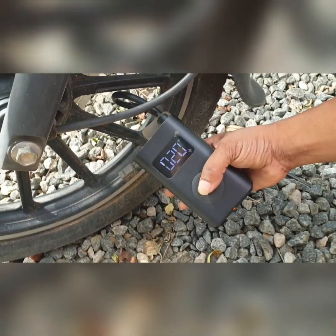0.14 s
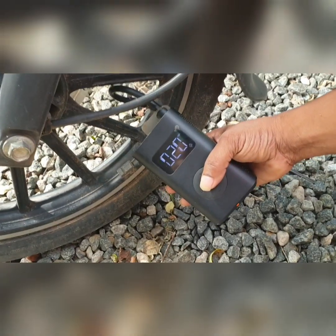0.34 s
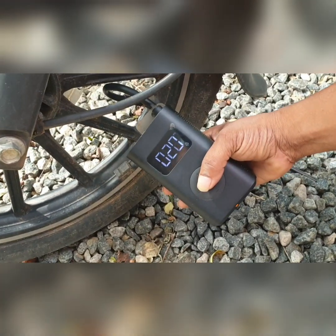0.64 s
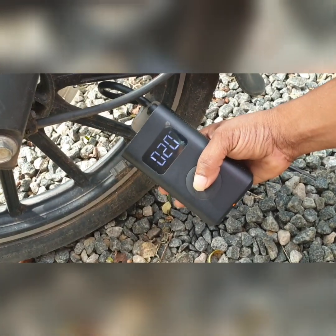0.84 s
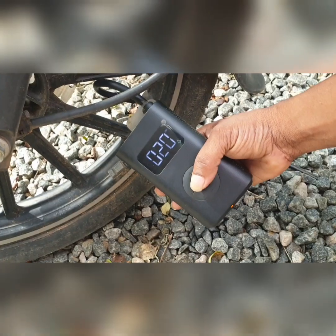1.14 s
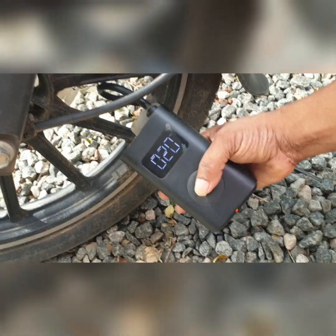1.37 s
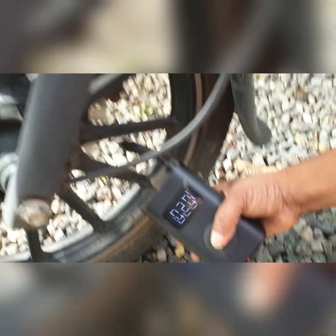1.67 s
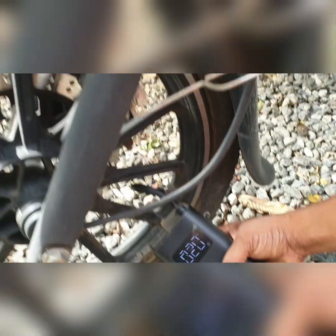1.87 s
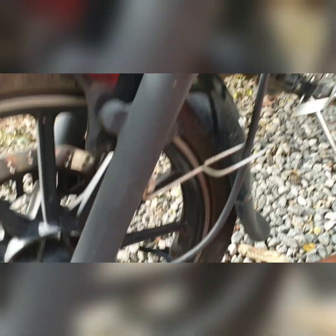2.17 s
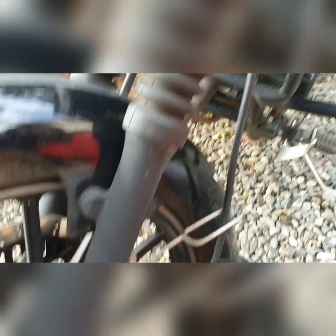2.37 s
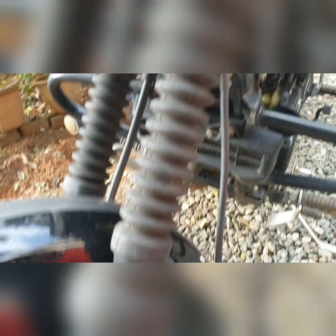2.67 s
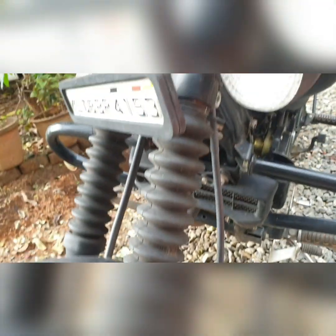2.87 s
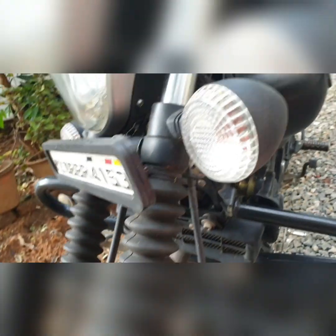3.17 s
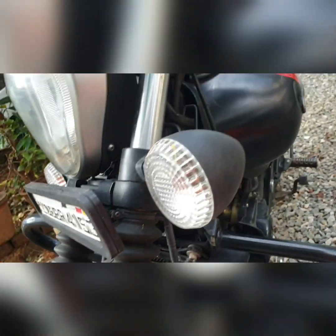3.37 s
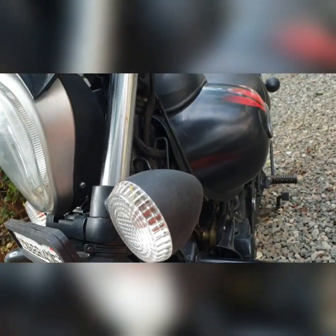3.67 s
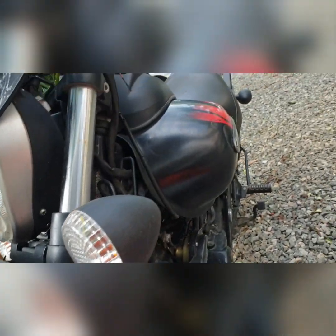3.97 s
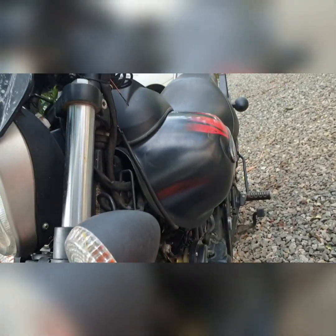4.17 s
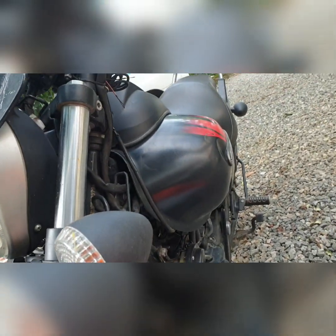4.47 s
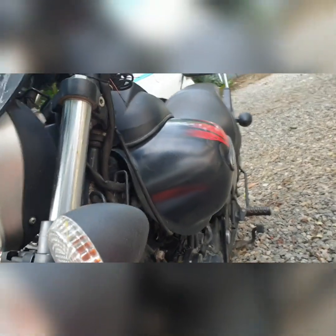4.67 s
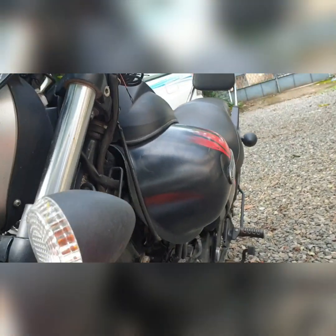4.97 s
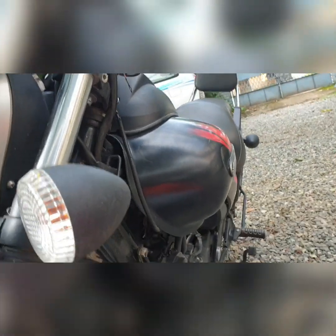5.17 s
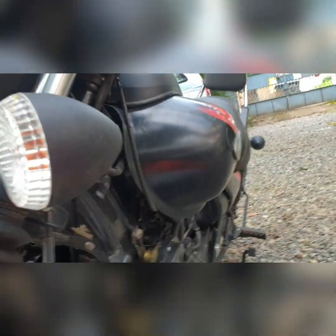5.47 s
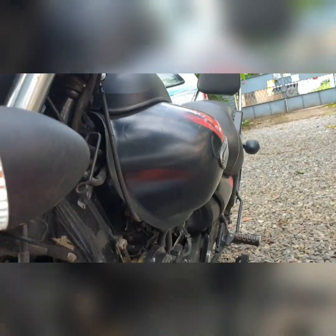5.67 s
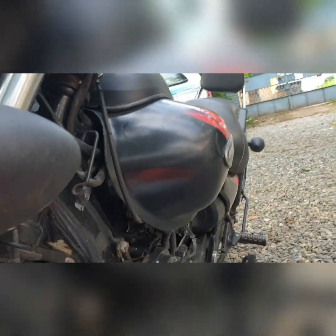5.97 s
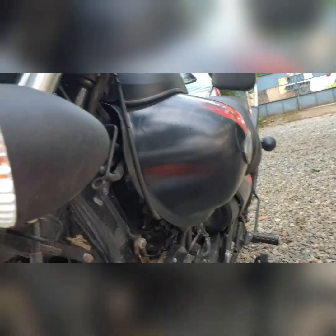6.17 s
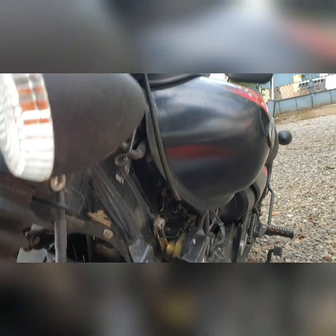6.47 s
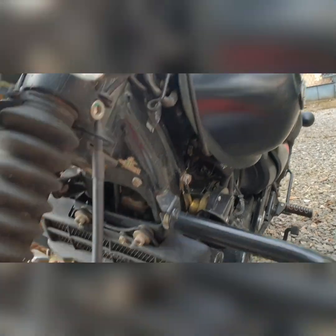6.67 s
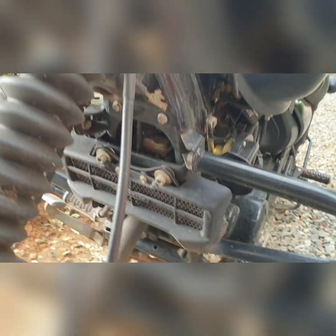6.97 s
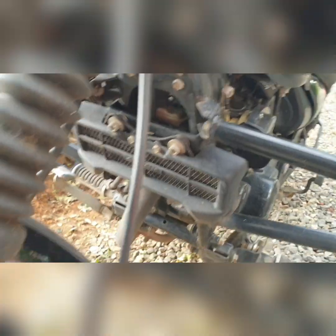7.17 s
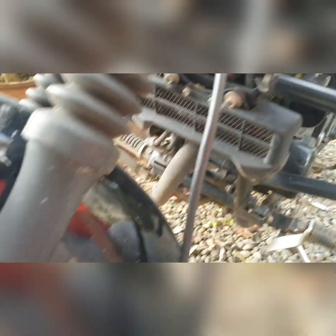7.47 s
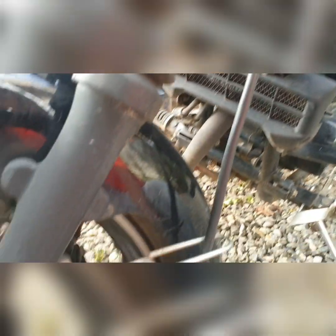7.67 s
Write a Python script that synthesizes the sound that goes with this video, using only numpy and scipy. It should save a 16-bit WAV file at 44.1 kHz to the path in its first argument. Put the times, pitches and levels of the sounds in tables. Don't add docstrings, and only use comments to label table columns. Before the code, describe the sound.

Rapid motorised piston chatter and whining gears run nonstop near a motorcycle tyre, growing muffled midway as wind puffs and handling bumps hit the microphone.

```python
import sys
import numpy as np
from scipy import signal
from scipy.fft import rfft, irfft, next_fast_len
from scipy.io import wavfile
from scipy.ndimage import uniform_filter1d, map_coordinates

SR = 44100
rng = np.random.default_rng(int(sys.argv[2]) if len(sys.argv) > 2 else 0)


def voltage_ratio(level):
    return 10 ** (np.asarray(level, float) / 20)


def bounce(signal):
    frames = np.transpose(np.atleast_2d(signal))
    limited = np.clip(frames, -1, 1)
    pcm = np.round(limited * 32767).astype(np.int16)
    wavfile.write(sys.argv[1], SR, pcm)


N = 344862
TIME = np.arange(N) / SR
CRANK_HZ = 33.35


def unit(x):
    return x / np.sqrt(np.mean(x ** 2) + 1e-20)


def along(points, hz):
    f, v = np.transpose(points)
    return np.interp(np.log(hz + 1), np.log(f + 1), v)


def curves(rows):
    s, *columns = np.transpose(rows)
    return np.array([np.interp(TIME, s, c) for c in columns])


def wobble(rate):
    return map_coordinates(rng.standard_normal(int(N * rate / SR) + 4), [TIME * rate])


def filtered(x, response):
    m = 2 * next_fast_len(N // 2 + 4096)
    return irfft(rfft(x, m) * response(np.fft.rfftfreq(m, 1 / SR)), m)[..., :N]


def ears_db(pan_db):
    return voltage_ratio(np.array([[pan_db / 2], [-pan_db / 2]]))


# pitch in Hz, time to fall 60 dB in ms, level in dB
HEAD_RING = [(1000, 22, -10), (1255, 30, -6), (1660, 14, -8), (2950, 6, -9)]


def piston(turns):
    whole = np.floor(turns + .1)
    ms = 1000 * (turns - whole) / CRANK_HZ
    chance = rng.standard_normal((int(whole.max()) + 2, 4))[whole.astype(int) + 1].T
    size = voltage_ratio(.45 * chance)
    crank_play_ms = .06
    early = ms + crank_play_ms * chance[3]
    knock = 0.32 * np.exp(-((early - .55) / 0.084) ** 2) - np.exp(-(early / 0.12) ** 2)

    seat = np.exp(-((ms - 4.7) / np.where(ms < 4.7, 2.3, .8)) ** 2)
    flutter = -.6 * seat * np.cos(2 * np.pi * 0.97 * (ms - 3.9))
    inlet = 0.28 * np.exp(-((ms - 15.8) / 0.25) ** 2) - 0.02 * np.exp(-((ms - 15) / .5) ** 2)

    slap_ms, slap_hz, slap_half_ms = 4.4, 860, 1.3
    since = ms - slap_ms
    slap = np.exp(-(since / slap_half_ms) ** 2) * np.cos(2 * np.pi * slap_hz * since / 1000)

    after = np.maximum(early - .2, 0)
    ring = 0
    for hz, t60, db in HEAD_RING:
        ring = ring + voltage_ratio(db - 60 * after / t60) * np.sin(2 * np.pi * hz * after / 1000)
    return size[0] * knock, size[1] * flutter + size[2] * inlet, size[1] * slap, size[0] * ring


# frequency in Hz, likeness from 0 to 1
EAR_LIKENESS = [(60, 1), (150, 1), (380, .97), (950, .66), (2380, .7), (5980, .5), (15000, .2)]


def paired(a, b):
    def turn(hz):
        angle = np.arccos(np.clip(along(EAR_LIKENESS, hz), -1, 1)) / 2
        return [np.cos(angle), np.sin(angle)]
    mid, side = filtered(np.array([a, b]), turn)
    return np.array([mid + side, mid - side])


# share of a turn, force in dB
GEAR_LOAD = [(0, 8.5), (.05, 9.5), (.14, 6.5), (.28, 3.5), (.38, 2.5), (.46, .5), (.58, 2.5), (.7, 5),
             (.8, 6), (.93, 5), (1, 8.5)]
TOOTH_TONE_DB = [-12, -24]
# multiple of the hum, level in dB
MOTOR_WHINE = [(2, -16), (3, -2), (4, -22), (5, -17), (6, -10)]
HUM_ORDER = 29.6


def gears(turns, hidden):
    wheel_teeth, pinion_teeth = 93, 15
    load_db = np.interp(turns % 1, *np.transpose(GEAR_LOAD))
    sag = .033
    wheel = turns + sag * np.sin(2 * np.pi * (turns - .45)) / (2 * np.pi)
    teeth = wheel_teeth * wheel
    runout = np.cos(2 * np.pi * teeth / pinion_teeth)

    press = 0.14 + np.exp(-((turns % 1 - .74) / 0.31) ** 2)
    tone = 0
    for k, db in enumerate(TOOTH_TONE_DB, 1):
        tone = tone + voltage_ratio(db) * np.sin(k * (2 * np.pi * teeth + 0.25 * wobble(53)))
    tone *= press * (1 + 0.64 * runout) * voltage_ratio(0.5 * wobble(30))

    hum = 2 * np.pi * HUM_ORDER * wheel + .11 * wobble(14)
    whine = sum(voltage_ratio(db) * np.sin(k * hum) for k, db in MOTOR_WHINE)
    whine_follows = .9
    tone += whine * voltage_ratio(whine_follows * (load_db - 4.5) + .7 * wobble(12))

    hit = np.flatnonzero(np.diff(np.floor(teeth)))
    tooth = np.floor(teeth[hit + 1]).astype(int)
    wear = rng.standard_normal((wheel_teeth, 2))[tooth % wheel_teeth]
    chance = rng.standard_normal((len(hit), 3))
    worn, clatter = np.zeros((2, 2, N))
    worn[:, hit] = wear.T
    clatter[:, hit] = chance[:, :2].T * voltage_ratio(0.5 * chance[:, 2])

    fizz = 1.22 * rng.standard_normal((2, N)) * voltage_ratio(0.41 * wobble(700))
    rattle = (unit(clatter) + fizz) * voltage_ratio(load_db + 0.085 * runout + 0.34 * wobble(35))
    loose_hz, worn_hz = 1500, 2300
    rattle = filtered(rattle, lambda hz: 1 - .8 / (1 + (hz / loose_hz) ** 4))
    bite = np.exp(-(((turns + .5) % 1 - .32) / 0.24) ** 2)
    rattle += 1.2 * filtered(unit(worn) * bite, lambda hz: 1 / (1 + (hz / worn_hz) ** 4))

    skip_order, skip_db, skip_hidden_db = 47, -3, 6
    skip = np.sin(2 * np.pi * skip_order * turns + .5 * wobble(17))
    tone += voltage_ratio(skip_db - skip_hidden_db * hidden + 1.25 * wobble(13)) * bite * skip

    air = rng.standard_normal((2, N + 1))
    rattle += 0.43 * air[:, 1:] + 0.41 * np.diff(air)
    return paired(rattle[0] + 0.78 * tone, rattle[1] + 0.5 * np.roll(tone, 37))


def casing(peaks, skin, ears, skin_db):
    def response(hz):
        power = voltage_ratio(2 * (along(skin, hz) + skin_db))
        rings = sum(voltage_ratio(2 * db) / (1 + (2 * (hz - c) / w) ** 2) for c, w, db in peaks)
        power = power + rings * (hz < 16000)
        cepstrum = irfft(np.log(power + 1e-9) / 2)
        cepstrum[1:len(hz) - 1] *= 2
        cepstrum[len(hz):] = 0
        return np.exp(rfft(cepstrum)) * voltage_ratio(along(ears, hz) * [[.5], [-.5]])
    return response


# left delay in ms, right delay in ms, change over the camera's swing in ms, level in dB
REFLECTIONS = [(0.369, 0.37, -0.16, -30), (0.799, 0.94, -.3, -46), (1.5, 1.213, 0.34, -20),
               (2.3, 2.9, 0.71, -18.5)]


def mirrored(sound, lag_ms, swing):
    def late(ear, ms):
        return np.interp(TIME - ms / 1000, TIME, sound[ear])
    out = np.array([late(0, lag_ms), sound[1]])
    for left_ms, right_ms, slide_ms, db in REFLECTIONS:
        out += voltage_ratio(db) * np.array([late(0, left_ms + slide_ms * swing), late(1, right_ms + slide_ms * swing)])
    return out


# middle in seconds, half length in seconds, frequency in Hz, relative width,
# change in dB
LEFT_BAND_SWELLS = [(0.49, 0.18, 6230, 0.03, -7), (0.58, 2, 9900, 0.022, 0), (1.25, 0.29, 7400, 0.08, 0),
                    (2.02, 0.2, 8300, 0.03, 5), (2.79, 0.17, 9130, 0.041, -2), (2.88, 1.2, 5720, 0.044, 2),
                    (3.07, 0.32, 6330, 0.036, 14.5), (3.09, 0.8, 9200, 0.38, -3), (3.34, 0.32, 1940, 0.13, -7),
                    (4.34, 1.6, 10500, 0.24, -3.5), (4.79, 0.49, 6900, 0.073, -4), (5.55, 1.2, 9100, 0.03, 4.5),
                    (6.27, 0.35, 11972, 0.03, -3), (7.8, 0.17, 2756, 0.08, -7), (7.8, 0.26, 6100, 0.046, -5),
                    (7.8, 1.4, 8000, 0.03, -6),
                    (0.0, 0.4, 3560, 0.025, -6.4), (0.49, 0.9, 7100, 0.026, -1), (1.0, 1, 3720, 0.032, 7),
                  (1.25, 0.38, 5140, 0.039, 4), (1.58, 1.2, 2340, 0.026, 1), (2.0, 1.6, 1840, 0.038, 9),
                  (2.02, 0.36, 3229, 0.027, 8), (2.46, 1, 4460, 0.074, -2.5), (2.88, 0.54, 7622, 0.12, -4),
                  (4.46, 1.4, 6072, 0.03, 0.5), (6.13, 0.63, 1210, 0.068, 7.5), (6.2, 0.25, 6800, 0.035, 7),
                  (6.87, 2.5, 7000, 0.08, -2), (7.52, 0.3, 2166, 0.08, 4.5), (7.8, 0.19, 5986, 0.05, 6),
                  (7.8, 1.6, 4435, 0.05, -7)]
RIGHT_BAND_SWELLS = [(0.3, 1.8, 9550, 0.038, 5.5), (0.98, 0.38, 8250, 0.054, -15), (1.6, 1, 5930, 0.05, 2.5),
                     (1.95, 0.35, 8140, 0.077, 3), (2.86, 0.32, 6029, 0.03, -8), (3.11, 0.69, 9130, 0.03, -6.5),
                     (3.62, 0.53, 4100, 0.06, -2), (4.55, 0.6, 6900, 0.069, 2), (5.15, 0.27, 9700, 0.024, 11),
                     (5.78, 1.1, 8900, 0.035, -10), (6.13, 2, 2330, 0.13, 5), (6.18, 1.7, 5426, 0.14, -7.5),
                     (6.81, 1.4, 2980, 0.11, -9.5), (6.83, 0.38, 1700, 0.04, 11), (7.5, 1.6, 10852, 0.05, 2),
                     (7.66, 0.32, 3320, 0.046, 11),
                     (0.3, 1.6, 2067, 0.12, 1), (0.81, 1, 7450, 0.03, -5), (2.83, 1, 7622, 0.03, -9),
                   (2.86, 0.6, 6800, 0.07, -2.5), (3.69, 1.4, 1750, 0.06, 11), (3.92, 1, 4100, 0.05, 4.5),
                   (4.27, 1.6, 3300, 0.13, -9), (4.34, 1, 1270, 0.087, -4), (4.53, 1.5, 856, 0.066, 9),
                   (5.34, 1.6, 4550, 0.027, -8), (6.27, 0.5, 1680, 0.06, 6), (7.24, 0.19, 3746, 0.043, -3),
                   (7.27, 1, 2600, 0.08, 4), (7.8, 0.25, 5598, 0.12, 2), (7.8, 0.25, 7751, 0.03, 2),
                   (7.8, 0.4, 4134, 0.03, 6.3)]
SHARED_BAND_SWELLS = [(4, 1, 3720, 0.034, -3.5), (8.3, 0.44, 4100, 0.046, -1), (1, 0.73, 5700, 0.04, -6),
                      (5.1, 0.41, 3000, 0.055, 2.5), (5.36, .2, 6400, 0.22, 3), (6.35, 0.21, 770, 0.086, -6),
                      (3.2, .5, 1780, .06, -9), (5.6, 1.6, 1540, 0.028, -2.5), (0.53, 2.2, 1326, 0.056, -8),
                      (6.25, .3, 4500, .06, 4), (1.75, 0.33, 560, 0.075, -5), (3.7, 0.4, 4100, 0.068, -5),
                      (5.07, .3, 4700, .08, 3), (4.9, .3, 1500, 0.13, -1.5), (2.7, .3, 2600, .1, -1),
                      (2.2, .3, 3300, .08, -1), (7, .3, 2500, .08, -0.5), (7.5, 0.45, 820, 0.084, 4),
                      (0.78, 1.8, 717, 0.05, -4.5), (3.9, 1.5, 725, 0.045, -10), (7, 1.1, 710, .04, -7.5),
                      (1, 1.8, 420, 0.1, 3), (4.3, 1.2, 430, 0.14, 2.5), (1.8, 2, 860, 0.055, 2),
                      (5.1, 0.34, 2300, .12, 4.5), (5.8, .3, 2200, .12, 2.5), (6.3, 0.25, 1170, .1, -2.5),
                      (5.7, 0.24, 3100, 0.099, -3)]


def band_swells(sound):
    hz, s, z = signal.stft(sound, SR, nperseg=1024)
    for ear, swells in enumerate([LEFT_BAND_SWELLS, RIGHT_BAND_SWELLS]):
        change_db = 0
        for at, half, c, width, db in swells + SHARED_BAND_SWELLS:
            octave = np.log((hz[:, None] + 1) / c) / width
            change_db = change_db + db * np.exp(-((s - at) / half) ** 2 - octave ** 2)
        z[ear] *= voltage_ratio(change_db)
    return signal.istft(z, SR, nperseg=1024)[1][:, :N]


# time in seconds, knock delay in ms
CRANK_DELAY = [(0, 4.11), (.3, 3.08), (.6, 2.39), (2.1, -.57), (2.4, -.75), (3.0, -.73), (3.35, -1.07),
               (3.6, -.92), (5.4, 2.83), (6.1, 4.85), (6.9, 6.66), (7.82, 8.52)]
# time in seconds, loss with distance in dB,
# share hidden behind the bike 0 to 1, bearing -1 to 1, swing round the bike 0 to 1
CAMERA = [(0, 0.5, 0, 0.53, 0.05), (1.0, 1, 0.05, 0.34, 0.09), (1.6, 0.4, 0, 0.53, 0.16),
          (2.2, -2, 0.01, 0.67, 0.15), (2.8, -2.5, 0.17, 0.86, 0.9), (3.6, -4, 1, 0.66, 0.26),
          (4.3, -4.5, 0.98, 0.44, 0.94), (5, -3.5, 1, -0.26, 0.88), (5.5, -4.5, 0.89, -1.07, 0.97),
          (6.1, -3.5, 0.97, -0.79, 0.81), (6.5, -2.5, 0.9, -0.69, 0.7), (6.8, -2, 0.64, -0.74, 0.52),
          (7.2, -1.5, 0.96, -0.61, 0.48), (7.82, 0.2, 0.67, -0.16, 0.1)]
FORK_TIMES = [1.48, 3.1, 3.7]
# frequency in Hz, width in Hz, level in dB
OPEN_RINGS = [(990, 150, 8.5), (1454, 110, 7), (2180, 21, 7.5), (2630, 39, 2.5), (3022, 41, -5.5),
              (3870, 91, -29), (4575, 270, -4.5), (6150, 220, -5), (8620, 100, -7.5), (11150, 180, -15.5),
              (11900, 230, -25)]
HIDDEN_RINGS = [(1232, 96, 6), (1640, 100, -33), (2974, 157, -0.5), (3246, 130, 2.5), (4460, 540, -5),
                (5960, 117, -10), (9200, 148, -6), (12040, 1800, -11)]
FORK_RINGS = [(1040, 55, 7), (1430, 49, 5.5), (2110, 270, 1), (2610, 74, 1.5), (3230, 320, -2),
              (4760, 300, -19), (5830, 290, -13), (6800, 210, -7), (7600, 180, -1.5), (9230, 240, -1),
              (11200, 320, -13)]
# frequency in Hz, level in dB per Hz
OPEN_BROAD = [(180, -9), (300, 1), (545, -8), (759, 10.5), (1340, -2), (1550, 9.5), (1920, -1), (2960, -3),
              (3550, -6.5), (6040, -9.5), (8140, -15.5), (12500, -12), (15800, -18.5)]
HIDDEN_BROAD = [(180, -31), (300, 5), (485, 7), (800, 10), (1000, 14.5), (1110, -41), (1250, 10.5),
                (2190, -3), (2960, -1), (3610, -24.5), (4550, -7.5), (6890, -9), (12300, -12.5),
                (15800, -22.5)]
FORK_BROAD = [(180, -47), (300, 0), (723, -5), (1010, 11.5), (1150, -13), (1500, -27), (2250, -12),
              (2960, -7.5), (3550, -19), (4550, -7), (8140, -27), (11900, -15), (15800, -30.5)]
# frequency in Hz, left minus right in dB
OPEN_TILT = [(60, -9), (130, 14), (290, 2), (640, 11), (1410, 3), (3100, 1.5), (6820, 2.5), (15000, -6)]
HIDDEN_TILT = [(60, 1.0), (130, 1.0), (290, 0), (640, -1.5), (1410, 11), (3100, 3), (6820, 8.5),
               (15000, -3)]
FORK_TILT = [(60, 0.5), (130, 1.0), (290, -4), (640, -4), (1410, 11.5), (3100, 1), (6820, 1), (15000, -8)]
PAST_CASING = [
    (1.5, 1.5, .6, 1),
    (1.2, .5, 1.2, 1.6),
    (1.1, 1.6, .6, 1.2),
]
BAND_EDGES_HZ = [1150, 2400, 7000]
# level close and open in dB, share of the distance loss,
# change behind the bike in dB, change past the fork in dB
CLOSE_DB = [-36, -39.5, -33, -37]
DISTANCE_SHARE = [0.97, 1, 0.76, 0.96]
BEHIND_DB = [-2.26, 2.93, 2.5, -1.5]
PAST_FORK_DB = [-1.9, 1, -2.1, 1]
FACING_PAN_DB = [0.45, .3, 0.36, 0.26]
BEARING_PAN_DB = [-.3, 0.34, -0.48, -0.54]
SWING_PAN_DB = [.3, .3, 0.69, .3]
# cycles per crank turn, level in dB, share of the distance loss
SHAKE_CYCLES = [2, 4, 6, 8, 16, 18, 20, 30, 52]
SHAKE_LEVELS_DB = [-52.5, -57.5, -60, -69, -86, -63, -59, -67, -54]
SHAKE_DISTANCE_SHARE = [1.1, 0.89, 0.64, 1, .3, .1, .1, 0.93, .2]


def pump():
    turns = CRANK_HZ * (TIME - curves(CRANK_DELAY)[0] / 1000)
    loss_db, hidden, bearing, swing = curves(CAMERA)
    hidden = np.clip(hidden, 0, 1)
    knock, valves, slap, ring = piston(turns)
    drive = gears(turns, hidden) + 1.8 * knock
    ring = ring * ears_db(5)
    direct = [a * knock + b * valves + c * slap + d * ring for a, b, c, d in PAST_CASING]

    open_shell = casing(OPEN_RINGS, OPEN_BROAD, OPEN_TILT, skin_db=-1.5)
    far_shell = casing(HIDDEN_RINGS, HIDDEN_BROAD, HIDDEN_TILT, skin_db=-3.5)
    fork_shell = casing(FORK_RINGS, FORK_BROAD, FORK_TILT, skin_db=3.5)
    open_side = unit(filtered(drive, open_shell)) + direct[0]
    far_side = unit(filtered(drive, far_shell)) + direct[1]
    fork_side = unit(filtered(drive, fork_shell)) + direct[2]

    fork = np.interp(TIME, FORK_TIMES, [0, 1, 0])
    seen = np.sqrt(1 - hidden) * open_side + np.sqrt(hidden) * far_side
    sound = np.sqrt(1 - fork) * seen + np.sqrt(fork) * fork_side
    ear_lag_ms = 0.0928
    sound = mirrored(sound, ear_lag_ms * bearing, swing)

    lows = filtered(sound, lambda hz: 1 / (1 + (hz / np.reshape(BAND_EDGES_HZ, (3, 1, 1))) ** 8))
    bands = np.diff([0 * sound, *lows, sound], axis=0)

    def column(values):
        return np.reshape(values, (-1, 1))
    levels_db = column(CLOSE_DB) + column(DISTANCE_SHARE) * loss_db
    levels_db = levels_db + column(BEHIND_DB) * hidden + column(PAST_FORK_DB) * fork
    pans_db = column(FACING_PAN_DB) + column(BEARING_PAN_DB) * bearing + column(SWING_PAN_DB) * swing
    heard = 0
    for band, level_db, pan_db in zip(bands, levels_db, pans_db):
        loudness = np.sqrt(np.abs(uniform_filter1d(band.mean(0) ** 2, size=SR // 3)))
        heard = heard + band / loudness * voltage_ratio(level_db + [pan_db / 2, -pan_db / 2])

    shake = 0
    faint_hum = (HUM_ORDER, -57, 0)
    for order, db, fade in [*zip(SHAKE_CYCLES, SHAKE_LEVELS_DB, SHAKE_DISTANCE_SHARE), faint_hum]:
        level = voltage_ratio(db + 6.5 + fade * loss_db + 1.3 * wobble(3.26))
        shake = shake + level * np.sin(2 * np.pi * order * turns)
    return band_swells(heard) + shake


# time in seconds, wind strength in dB
WIND_STRENGTH = [(0, -46.5), (.4, -53.5), (.9, -50), (1.3, -48), (1.5, -50), (1.65, -47.5), (2, -49.5),
                 (2.85, -48.5), (3.15, -50.5), (3.45, -46.5), (3.75, -46.5), (4.0, -42), (4.3, -42),
                 (4.7, -42), (5.2, -43.5), (5.45, -46), (6.2, -46), (6.5, -44.5), (6.85, -47), (7.6, -42.5)]
# frequency in Hz, level in dB per Hz
RUMBLE_COLOUR = [(12, -41), (30, -15), (48, -10), (70, 1), (102, 0.5), (130, -3.5), (204, -8), (300, -11.5),
                 (390, -31), (660, -120)]
AIR_COLOUR = [(120, -38), (200, -0.5), (400, 5.5), (700, 1.5), (1500, -8)]
SWAY_COLOUR = [(15, -60), (26, -17), (38, -2), (50, -5), (70, -64)]
# time in seconds, strength in dB
ARM_SWAY = [(0.0, -58), (0.06, -55), (0.11, -66), (2.61, -64), (3.53, -55), (4.42, -51.5), (6.32, -50.5),
            (6.66, -58), (7.1, -48), (7.82, -51)]


def wind():
    rumble_db, = curves(WIND_STRENGTH)
    air_level_db, air_follows = -51, 0.24
    air_db = air_level_db + air_follows * (rumble_db - rumble_db.mean()) + 0.89 * wobble(2.3)
    shared, left, right, *far = rng.standard_normal((5, N))
    own = .42
    rumble = filtered(shared + own * np.array([left, right]), lambda hz: voltage_ratio(along(RUMBLE_COLOUR, hz)))
    air = filtered(shared[::-1] + 0.9 * np.array(far), lambda hz: voltage_ratio(along(AIR_COLOUR, hz)))
    sway = filtered(rng.standard_normal(N), lambda hz: voltage_ratio(along(SWAY_COLOUR, hz)))

    mix = voltage_ratio(rumble_db + 2.16 + 0.93 * wobble(5.7) + 0.65 * wobble(8.2)) * unit(rumble)
    mix = mix + voltage_ratio(air_db + wobble(8.4)) * unit(air)
    mix = mix + voltage_ratio(curves(ARM_SWAY)[0] + 5.5) * unit(sway)

    engine_s, engine_half_s, engine_hz, engine_db = 5.92, .33, 268, -52
    swell = voltage_ratio(engine_db + 4.0 + 2.0 * wobble(13)) * np.exp(-((TIME - engine_s) / engine_half_s) ** 4)
    engine = swell * np.sin(2 * np.pi * engine_hz * TIME + 1.7 * wobble(25))
    return mix * ears_db(1.2) + engine


# time in seconds, peak in dB, pitch in Hz, left minus right in dB
EDDIES = [(3.584, -33, 91.5, 1.5), (3.72, -35, 89, 1), (4.129, -30, 125, -5), (4.256, -33, 78.2, 2.0),
          (4.309, -26, 137, -0.5), (4.399, -29, 70.0, 1.0), (4.429, -34, 128, 3), (4.49, -30, 142, 5),
          (4.551, -34, 150, -2), (4.511, -30, 80, -2), (4.18, -34, 75, -5), (4.67, -34, 190, 8),
          (5.126, -35, 101.5, -1), (5.199, -26, 45, -2), (5.51, -34, 170, 13), (5.84, -31, 50, 2),
          (4.605, -35, 62.4, 0), (4.669, -36, 95, 7), (4.823, -33, 96, 7), (4.888, -29, 70.0, -6),
          (5.032, -30, 72, -4), (6.168, -27, 56.5, -2), (6.899, -29, 64.6, 4), (7.223, -37, 99.6, 2.0)]


def puffs():
    half_ms, under_peak_db = 18.2, -6
    out = np.zeros((2, N))
    for s, db, hz, pan_db in EDDIES:
        late = TIME - s - half_ms / 1000
        lump = np.exp(-(1000 * late / half_ms) ** 2) * np.sin(2 * np.pi * hz * late)
        out += voltage_ratio(db + under_peak_db) * ears_db(pan_db) * lump
    return out


# time in seconds, peak in dB, ring in Hz, left minus right in dB
HAND_BUMPS = [
    (4.69, -31, 300, 10),
    (4.955, -36, 298, 17),
    (5.522, -27, 328, 16),
    (5.655, -31, 230, 15),
    (5.662, -34, 440, 18),
]


def bumps():
    ring_ms = 1.5
    thud_hz, thud_ms, thud_db = 82, 22, -9.5
    out = np.zeros((2, N))
    for s, db, hz, pan_db in HAND_BUMPS:
        ms = (TIME - s) * 1000
        push = np.exp(-(ms / ring_ms) ** 2) * np.cos(2 * np.pi * hz * (TIME - s))
        thud = np.exp(-((ms + 6) / thud_ms) ** 2) * np.cos(2 * np.pi * thud_hz * (TIME - s))
        out += voltage_ratio(db) * ears_db(pan_db) * (push + voltage_ratio(thud_db) * thud)
    return out


def scene():
    return pump() + wind() + puffs() + bumps()


def top_cut(x):
    return signal.sosfilt(signal.butter(12, 15900, fs=SR, output="sos"), x)


def record(dry):
    soft = dry / (1 + np.abs(dry / .36) ** 4) ** (1 / 4)
    bass_hz, top_hz = 34, 15850
    mix = filtered(soft, lambda hz: (hz < top_hz) / (1 + (bass_hz / (hz + 1)) ** 6))
    return top_cut(mix)


dry = scene()
out = record(dry)
bounce(out)
```